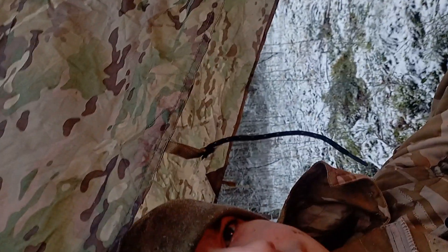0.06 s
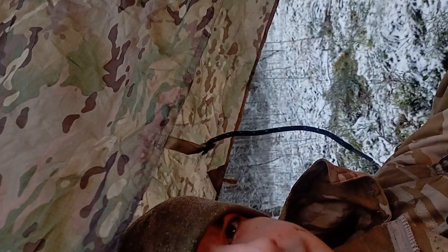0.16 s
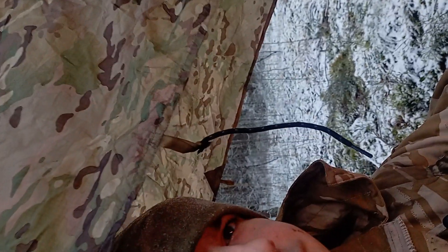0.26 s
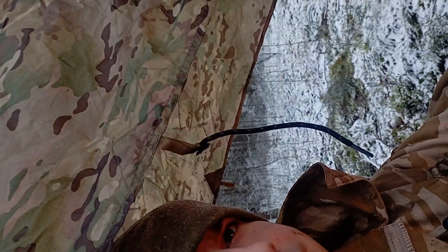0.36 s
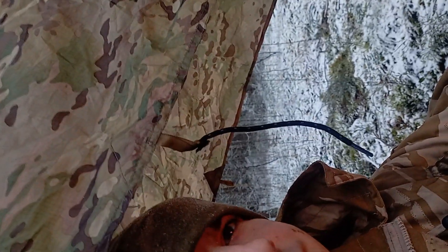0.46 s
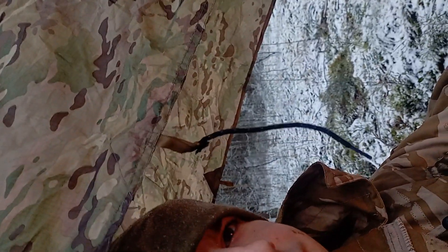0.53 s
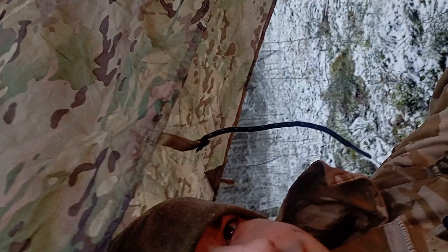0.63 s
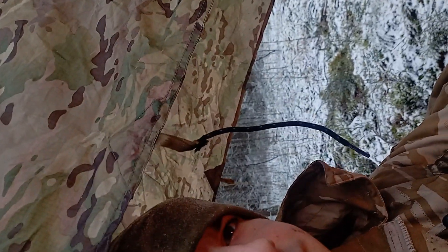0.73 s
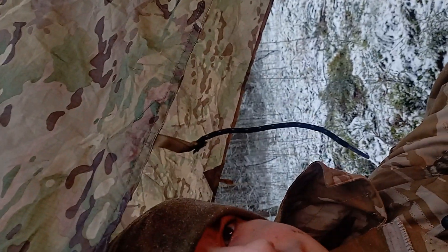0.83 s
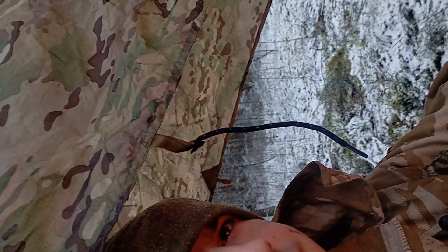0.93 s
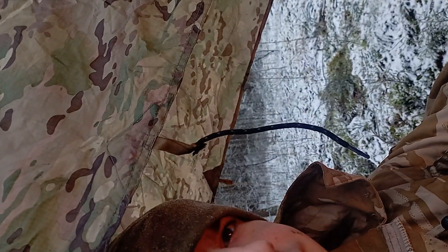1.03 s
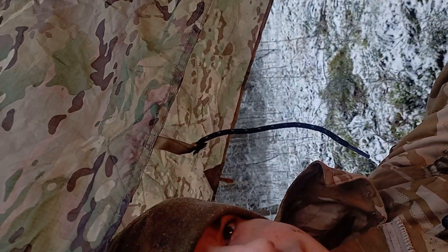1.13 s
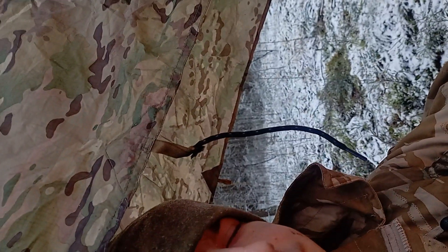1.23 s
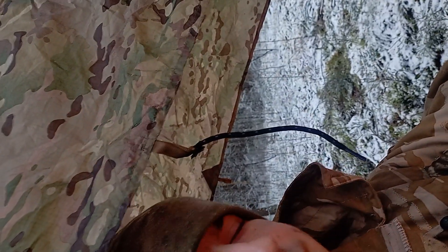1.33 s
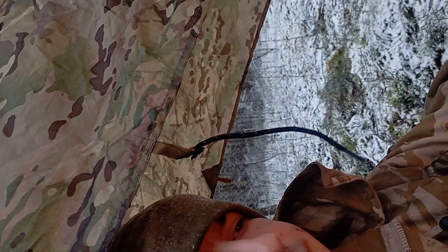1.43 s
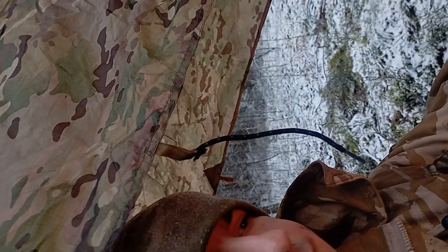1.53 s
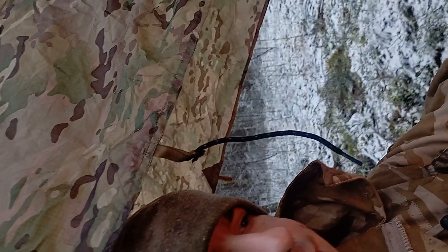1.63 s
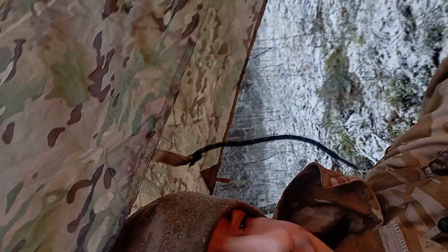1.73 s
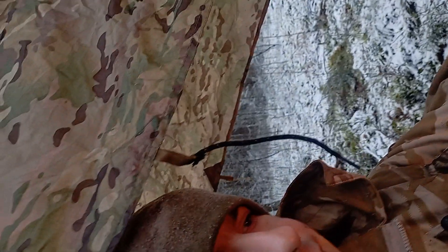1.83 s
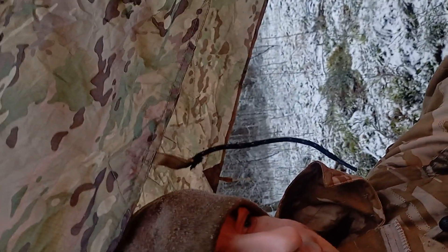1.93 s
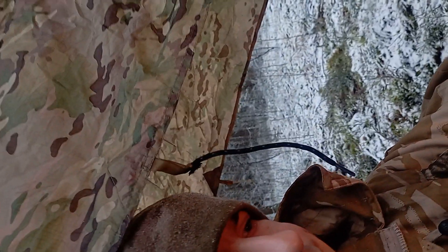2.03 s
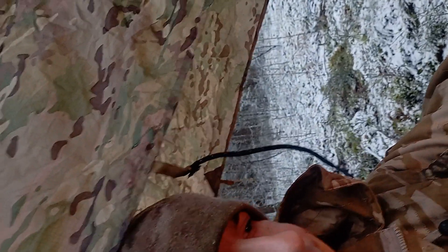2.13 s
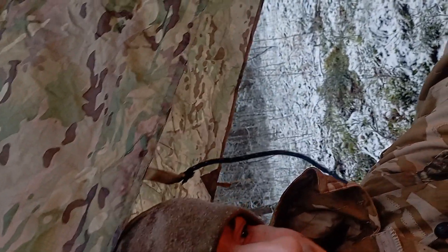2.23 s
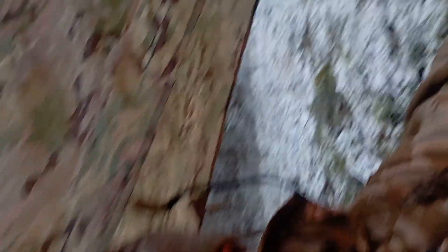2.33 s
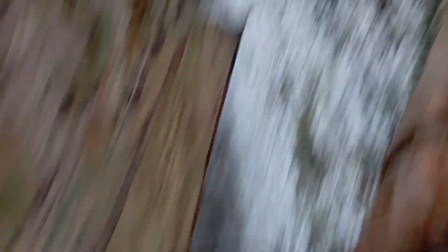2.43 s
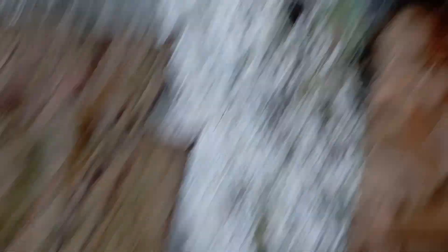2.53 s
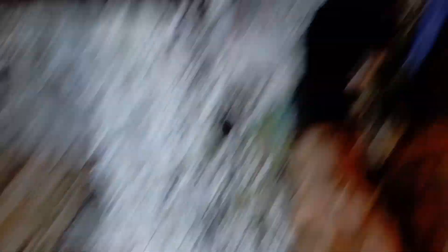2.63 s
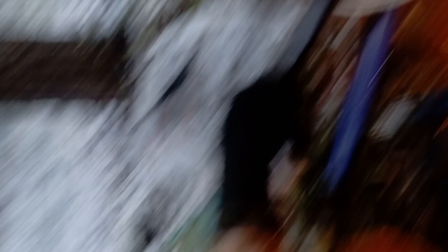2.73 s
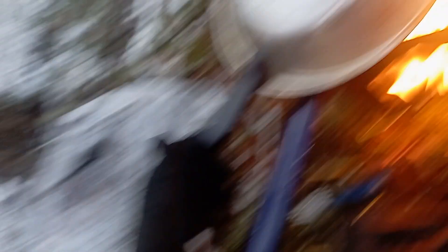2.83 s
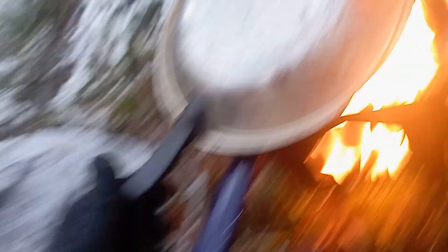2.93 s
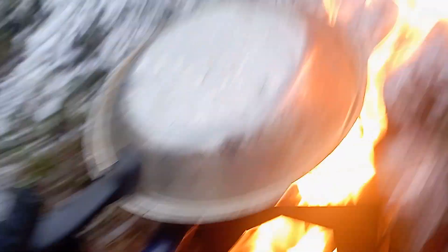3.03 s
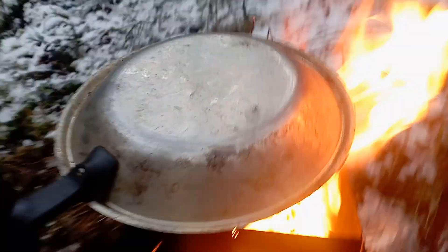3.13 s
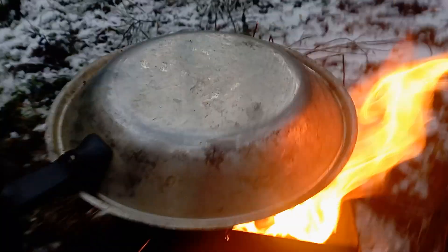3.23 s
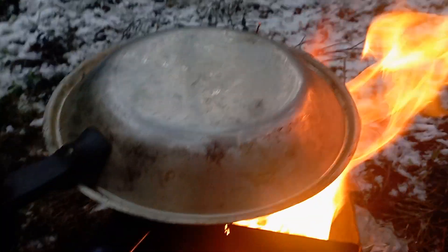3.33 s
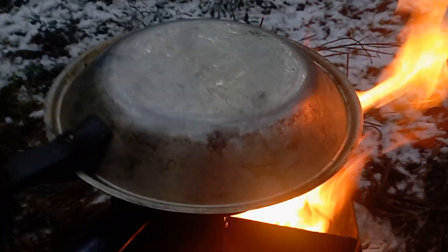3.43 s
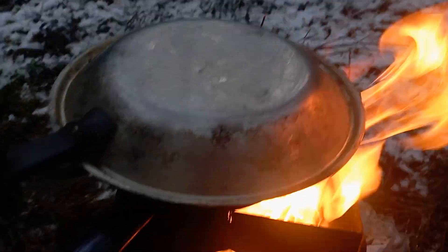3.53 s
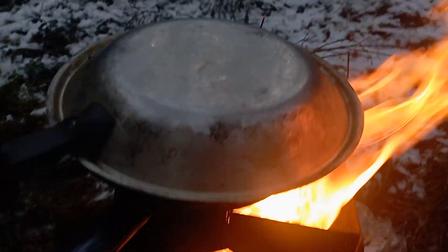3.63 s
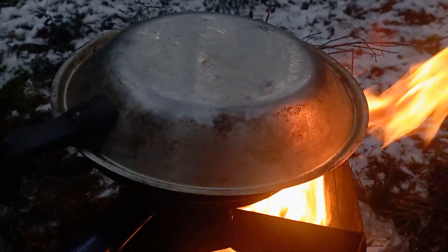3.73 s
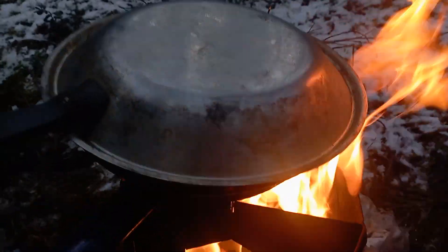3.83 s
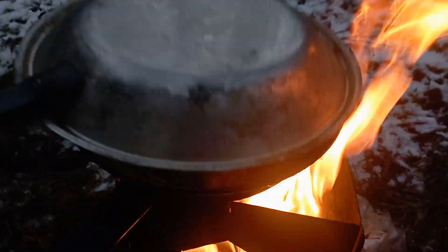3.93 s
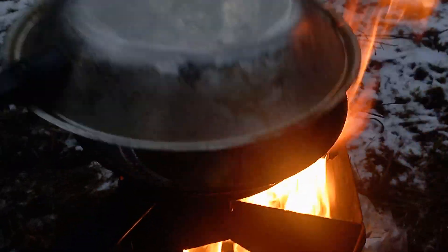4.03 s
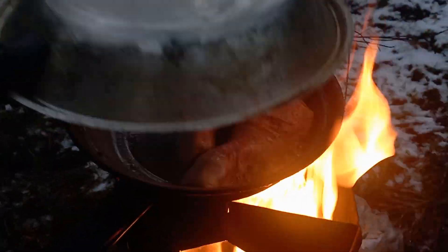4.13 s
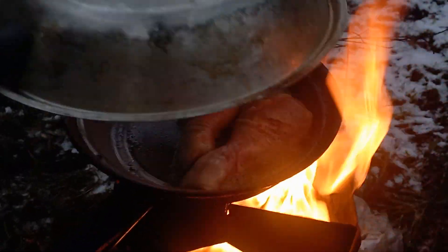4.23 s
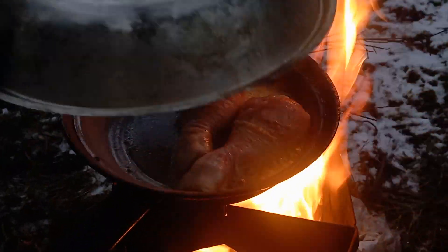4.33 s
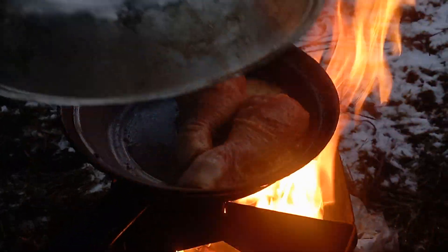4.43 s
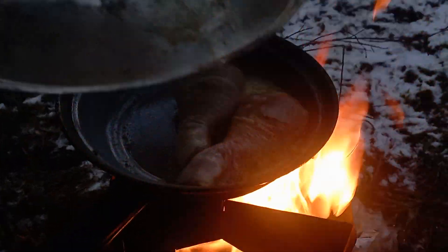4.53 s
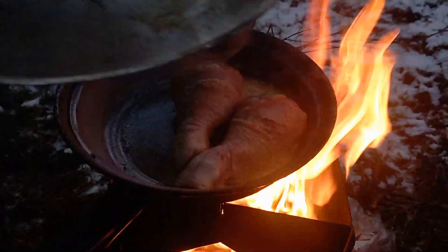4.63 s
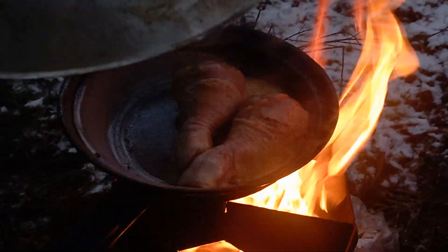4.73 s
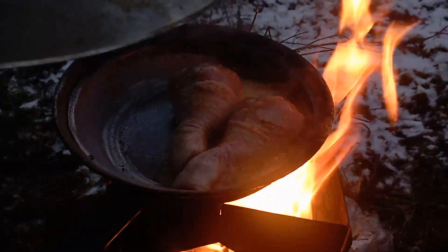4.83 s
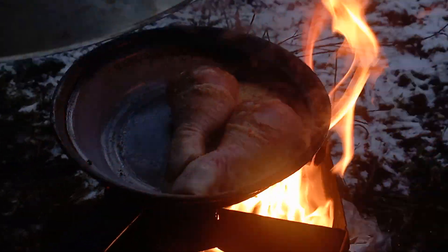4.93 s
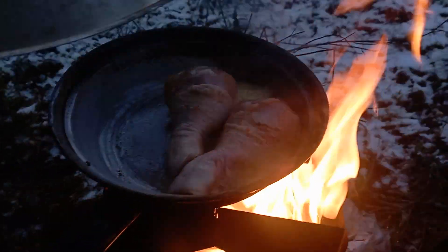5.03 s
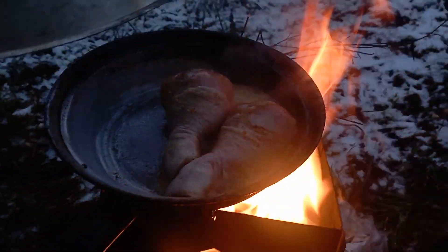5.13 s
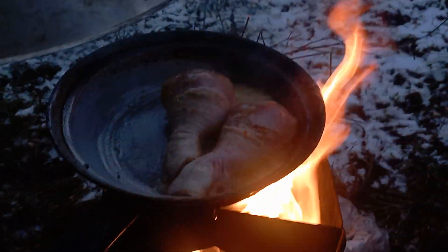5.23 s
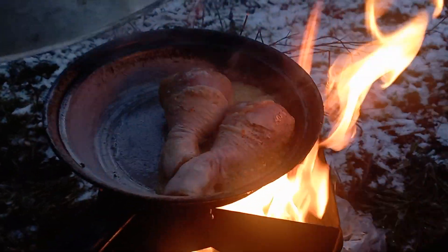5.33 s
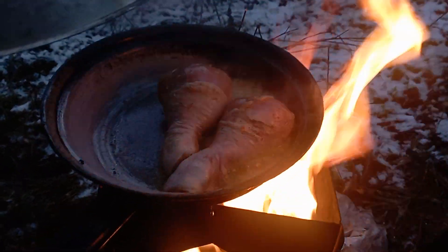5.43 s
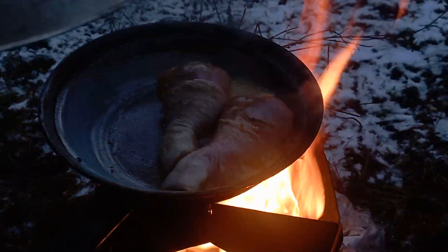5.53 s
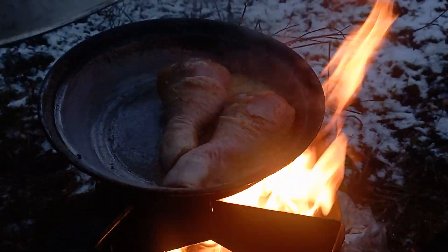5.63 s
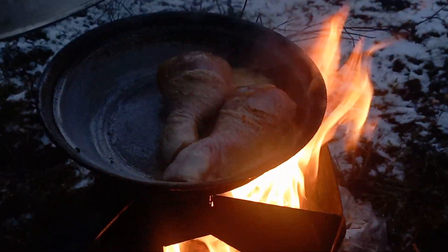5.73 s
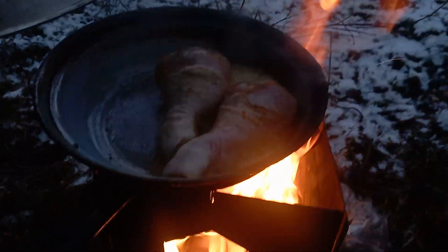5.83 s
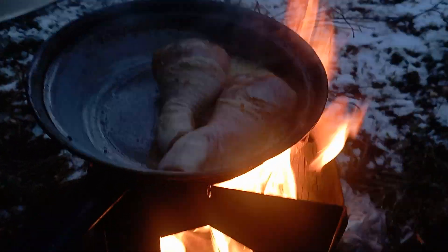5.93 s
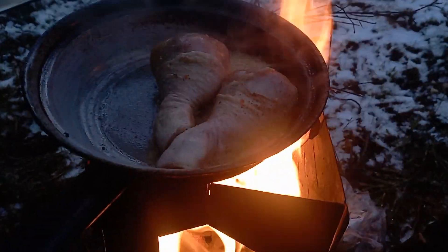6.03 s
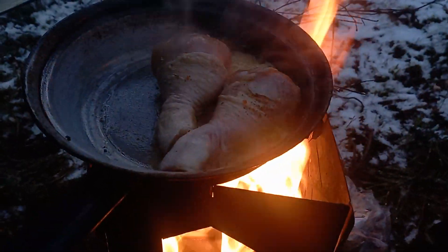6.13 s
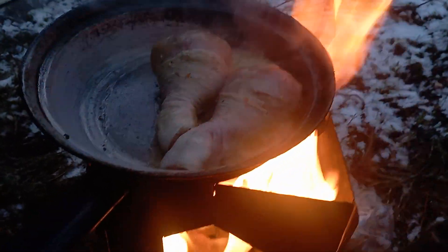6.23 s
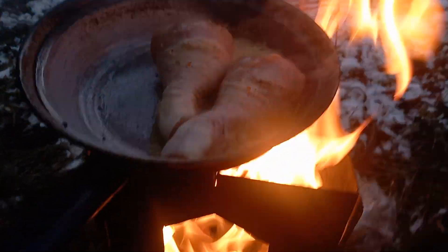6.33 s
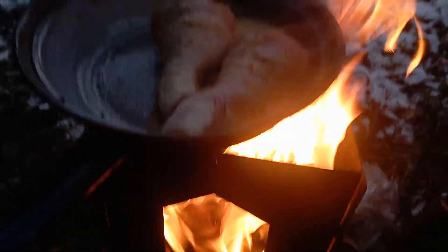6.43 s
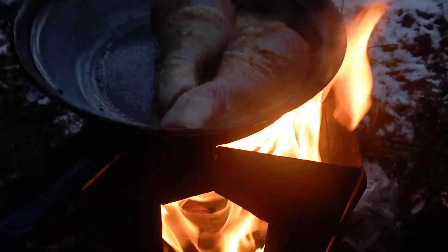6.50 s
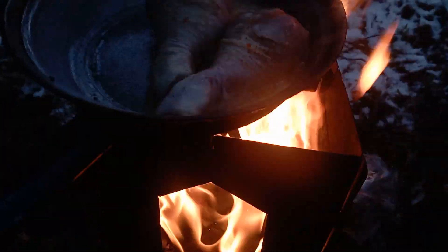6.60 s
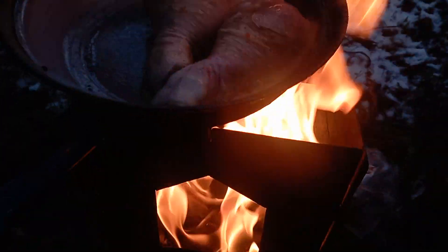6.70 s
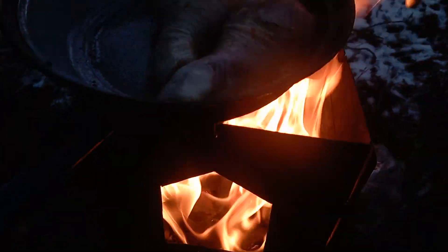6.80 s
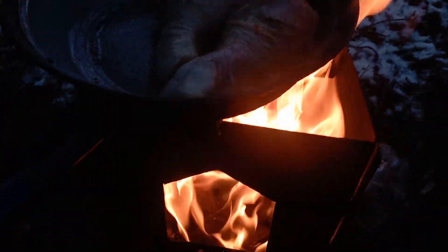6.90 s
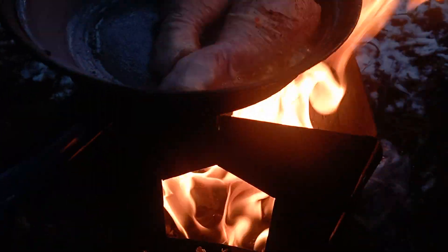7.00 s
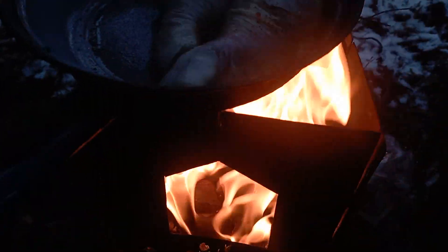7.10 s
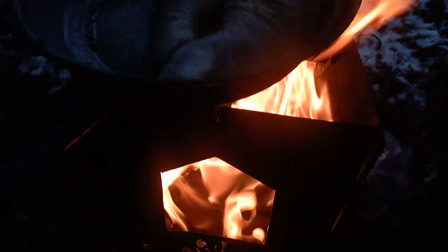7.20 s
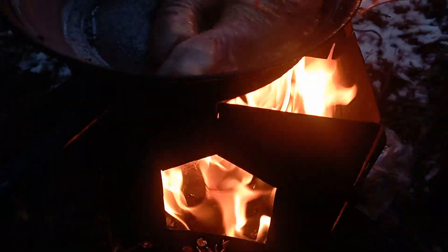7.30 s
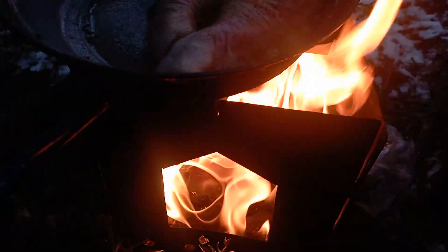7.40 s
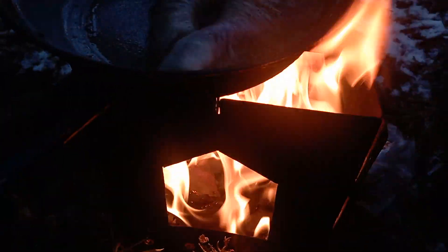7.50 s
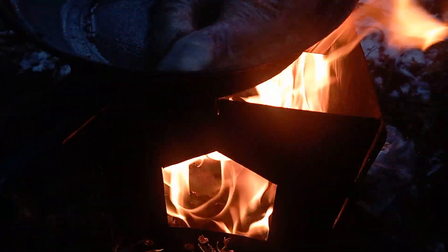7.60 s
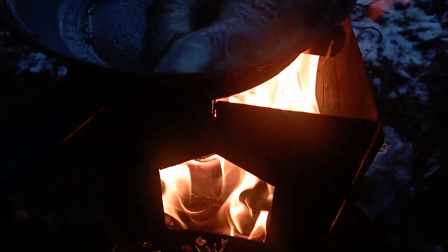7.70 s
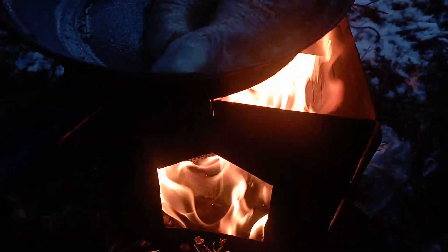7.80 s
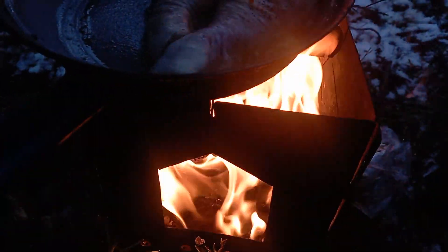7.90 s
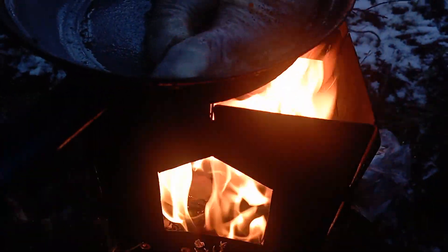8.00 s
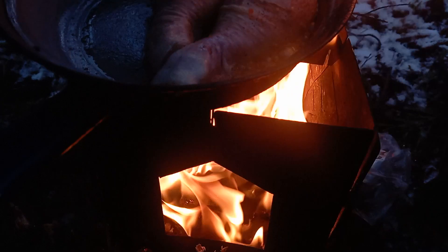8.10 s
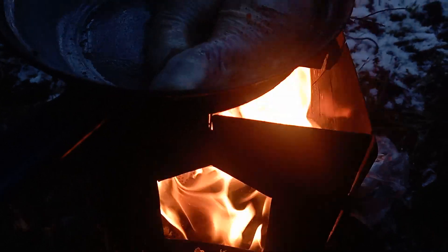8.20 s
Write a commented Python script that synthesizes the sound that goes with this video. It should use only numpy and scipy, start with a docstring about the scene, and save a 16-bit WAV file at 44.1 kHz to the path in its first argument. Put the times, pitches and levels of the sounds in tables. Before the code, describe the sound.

Close stereo sound in open air, without room echo: distant muffled frying and faint low flame puffs at first, then a brief rub of clothing and a dull handle knock. As the metal lid comes off, the hollow ring disappears and the sizzle grows crisp and strong, leaning left. Fat cracks sharply, juice bubbles pop, and burning wood snaps dryly until the end.

```python
"""Outdoors in the snow, close to a small wood stove: chicken sizzles in a lidded pan.
The microphone swings round to the pan and the lid is lifted: the hiss, random clicks over noise, loses
the hollow ring of the covered pan (resonant filters) and turns loud and bright.
Fat spits (filtered noise bursts), bubbles pop (short decaying tones) and flames flutter (coloured noise).
Wood snaps, clothing rustles (bands of noise) and a hand bumps the handle (struck modes)."""
import sys
import numpy as np
from scipy import signal
from scipy.fft import rfft, irfft
from scipy.io import wavfile
from scipy.ndimage import uniform_filter1d

SR = 44100
rng = np.random.default_rng(int(sys.argv[2]) if len(sys.argv) > 2 else 0)


def transcribe(u):
    """Save the signal u as a 16-bit wav file named by the first command-line argument.

    u: samples, shape (n,) or (channels, n), limited to [-1, 1]; the rate is SR.
    q: integer samples, one column per channel.
    """
    v = np.clip(np.atleast_2d(u).T, -1, 1)
    q = np.round(v * 32767).astype(np.int16)
    wavfile.write(sys.argv[1], SR, q)


N = 364001
T = np.arange(N) / SR
BINS = np.arange(2049) * SR / 4096  # Hz

# the frying, louder as the microphone comes near and the lid comes off:
# [t/s, bright fizz level/dB before surges and flares, fizz left minus right/dB, coarse simmer level/dB]
FRYING = [(0, -49, -1.5, -55.5), (2.45, -50.5, -3, -55), (2.75, -47.5, -1, -55), (3.05, -43, -7.5, -51),
          (3.21, -40.5, 3.5, -52.5), (3.5, -41.5, 1.5, -51.5), (3.79, -31.5, 5.5, -46.5),
          (4.0, -30.5, 3, -45.5), (4.25, -30.5, -0.5, -42), (4.3, -29, -2, -41.5),
          (4.65, -26.5, 5.5, -38.5), (5.0, -26.5, 8, -38), (5.35, -29, 5.5, -38.5),
          (6.25, -28.5, 5.5, -37.5), (6.6, -31, 6.5, -38), (8.25, -29.5, 7, -39)]
# the lid: [t/s, open share 0-1, lag of the echo from the metal nearby/ms]
LID_MOTION = [(0, 0, 1.32), (2.6, 0.03, 1.37), (3.0, 0, 1.5), (3.5, 0.2, 1.5), (3.72, 0.24, 1.3),
              (4.1, 0.92, 1.34), (5.0, 1, 1.77), (8.25, 1, 2.05)]
# where the microphone points: [t/s, share heard from above the pan 0-1, lag of the left port/ms]
MIC_AIM = [(0, 0.32, 0.26), (2.4, 0.12, 0.25), (2.6, 0, -0.046), (2.85, 0.87, -0.082), (3.6, 0.97, -0.1),
           (5.7, 1, -.14), (6.3, 0.95, -0.09), (8.25, 0.9, -0.1)]
# air resonances between pan and lid: [f/Hz with the lid shut, width/Hz, left level/dB, right level/dB]
PAN_AIR = [(1278, 220, 3.5, 19.5), (2046, 140, 8.5, 10), (2916, 290, 10, 11.5), (3710, 250, 7, 0.5),
           (4500, 110, 7, 6.5), (5210, 120, 6, 3), (6030, 170, 7.5, 2.5), (6680, 130, 4, 6),
           (8260, 260, 3.5, 3.5)]
# the loudest sharp spits of fat: [t/s, peak level/dB before panning, f/Hz, left minus right/dB]
FAT_SPITS = [(1.7305, -33.5, 5800, -5), (2.2355, -29, 9400, -10), (4.3005, -15, 8600, 2),
             (4.3679, -16, 9000, 7), (4.453, -15, 8800, -4), (4.55, -11, 9300, -4), (4.6517, -16, 9700, 10),
             (4.932, -15, 9700, -5), (4.9803, -14.5, 9200, 7), (5.05, -15, 9400, 7), (5.0637, -9, 9700, 5),
             (5.246, -6.5, 9300, 11), (5.577, -15, 8900, 5), (5.5934, -19, 9000, 5), (5.694, -17, 9400, 13),
             (5.801, -15, 9170, 10), (5.8687, -13, 9600, 9), (5.9855, -15, 9800, 5), (6.152, -13, 9700, 11),
             (6.2138, -20, 9700, 4), (6.3912, -14, 9500, -6), (6.4663, -17, 9700, 10),
             (6.9027, -26, 9500, -1), (6.9486, -15, 8800, 3), (7.3987, -20, 9700, 2)]


def amp(db):
    """Decibels to gain."""
    return 10 ** (np.asarray(db) / 20)


def curves(table):
    """Each column of a table, joined by straight lines in time."""
    s, *columns = np.transpose(table)
    return [np.interp(T, s, c) for c in columns]


def unit(x, axis=None):
    """Scale to rms 1."""
    return x / np.sqrt(np.mean(x ** 2, axis=axis, keepdims=True))


def ports(pan_db):
    """Left and right gain from the level left minus right."""
    return amp(np.array([[.5], [-.5]]) * pan_db)


def walk(rate):
    """Smooth chance with a spread near 1, aiming at a new value rate times a second."""
    k = int(SR / rate)
    steps = rng.standard_normal(N)[np.arange(N) // k]
    return 1.2 * uniform_filter1d(steps, k)


def slope(points, column=1):
    """A spectrum in dB from its corner points, straight over log frequency."""
    points = np.array(points)
    return np.interp(np.log(BINS + 1), np.log(points[:, 0]), points[:, column])


def colour(x, db):
    """Causal (minimum-phase) filter with the given spectrum, by folding its cepstrum."""
    cepstrum = irfft(np.log(amp(db)))
    fold = np.r_[1, np.full(len(db) - 2, 2), 1, np.zeros(len(db) - 2)]
    response = irfft(np.exp(rfft(cepstrum * fold)))
    return signal.oaconvolve(x, response)[:N]


def resonate(x, hz, width_hz):
    """One resonance with gain 1 at its centre."""
    return signal.lfilter(*signal.iirpeak(hz, hz / width_hz, fs=SR), x)


def ring(hz, t60):
    """A struck mode: a sine that falls 60 dB in t60 seconds."""
    t = T[:SR // 5]
    return np.sin(2 * np.pi * hz * t) * np.exp(-np.log(1000) * t / t60)


def add(out, s, sound):
    """Mix a sound into both channels from time s."""
    i = max(int(s * SR), 0)
    out[:, i:i + sound.shape[-1]] += sound[..., :max(N - i, 0)]


def late(x, lag_ms):
    """A sound delayed by a lag that may move."""
    return np.interp(T - lag_ms / 1000, T, x)


def sizzle(shared_hz=1600, covered_shared_hz=3100, split_hz=5770, echo=0.17, fizz_echo=0.092):
    """The frying: droplet clicks, smeared and hollow under the lid, crisp in the open."""
    # colour of the frying with the lid off: [f/Hz, left level/dB, right level/dB]
    open_colour = [(450.0, -31, -31.5), (900.0, -29.5, -29), (1200.0, -33, -23), (1500, -22.5, -18),
                   (2900.0, -13.5, -15), (4800, -11, -17), (5750, -8.5, -17.5), (7100, -2.5, -6.5),
                   (9180, 6, -2.5), (10100, 8.5, -7.5), (11430, 2, -14), (12360, -2.5, -13),
                   (14000, -3.5, -20), (15900, -11.5, -13.5)]
    # the covered pan heard from the side: [f/Hz, left level/dB, right level/dB]
    side_colour = [(466, -16.5, -10), (820, -34, -22.5), (1800, -11, -15.5), (2500.0, -13.5, -14),
                   (4050, -18.5, -8.5), (5940, -6, 1.5), (7400, 1, -0.5), (8760, 6.5, 6.5),
                   (11000, 7.5, 3.5), (12300, -2, 0), (13500.0, 3, -1), (15600.0, -1, -1.5)]
    # the covered pan heard from just above: [f/Hz, left level/dB, right level/dB]
    above_colour = [(480, -15, -12.5), (900.0, -23, -29), (1730, -28.5, -30.5), (2210, -23, -11.5),
                    (3300.0, -10, -22), (4800.0, -12, -26), (6130, -11, -13), (7260, -9.5, 0.5),
                    (8500, 1, 5.5), (9500, 10, 2), (11600, 5, -12.5), (13300, 3, -24), (16100, -7, -3)]
    # the standing wave between pan and rising lid: [t/s, f/Hz, level against the simmer/dB]
    lid_wave = [(2.8, 1275, -26), (3.3, 1250, -16), (3.7, 1335, -27), (4.1, 1570, -28), (4.4, 1424, -25),
                (4.7, 1247, -30), (5.05, 1162, -27), (5.6, 1220, -26.5), (6.3, 1336, -32)]
    surge_db, surges_per_s = 0.35, 13  # the fat surges and ebbs by chance
    flare_db = 2.06  # the fizz flares up round each spit
    # the air in the gap under the rim rises in pitch as the lid opens, and rings most when it is ajar
    gap_shut_hz, gap_rise_octaves = 420, 0.97
    gap_db, gap_ajar_share, gap_spread_share = -13.5, 0.36, 0.35

    fizz_db, pan_db, simmer_db = curves(FRYING)
    fizz_db = fizz_db + surge_db * walk(surges_per_s) + flare_db * flares()
    opening, lag_ms = curves(LID_MOTION)
    opening, above = np.clip([opening, curves(MIC_AIM)[0]], 0, 1)

    muffled = droplets(rate=5000, spread_db=2.5, mist_db=-1.5, splutter_db=0.83, patchy_db=2.1)
    crisp = droplets(rate=5000, spread_db=2.6, mist_db=-2.0, splutter_db=0.6, patchy_db=1.7)
    from_side = np.sqrt(1 - above) * voiced(muffled, side_colour)
    from_above = np.sqrt(above) * voiced(muffled, above_colour)
    covered = hollow(shared(from_side + from_above, covered_shared_hz), opening)
    covered_bands = split(covered, split_hz)
    open_bands = split(voiced(crisp, open_colour), split_hz)
    simmer, fizz = np.sqrt(1 - opening ** 2) * covered_bands + opening * open_bands

    gap_hz = gap_shut_hz * 2 ** (gap_rise_octaves * opening)
    gap_gain = amp(gap_db) * np.exp(-((opening - gap_ajar_share) / gap_spread_share) ** 2)
    wave_hz, wave_db = curves(lid_wave)
    gap_air = gap_gain * singing_air(gap_hz, width_hz=104)
    wave_air = amp(wave_db) * singing_air(wave_hz, width_hz=110)
    simmer = shared(simmer, shared_hz) + gap_air + wave_air
    # an echo off nearby metal combs the sound as lid and microphone move
    simmer = np.array([x + echo * late(x, lag_ms) for x in simmer])
    fizz = np.array([x + fizz_echo * (1 - opening) * late(x, lag_ms) for x in fizz])
    return simmer * amp(simmer_db) + fizz * amp(fizz_db) * ports(pan_db)


def droplets(rate, spread_db, mist_db, splutter_db, patchy_db):
    """Water droplets flash to steam in the fat: clicks of all sizes, in flurries, over a mist of tiny ones."""
    sizes = amp(spread_db * np.minimum(rng.exponential(size=(2, N)), 5))
    struck = rng.random((2, N)) < rate / SR  # rate in clicks per second
    clicks = unit(struck * sizes * rng.choice([-1, 1], (2, N)))
    mist = amp(mist_db) * rng.standard_normal((2, N))
    flurry_db = splutter_db * (walk(22) + np.array([walk(90), walk(90)]))
    return patches((clicks + mist) * amp(flurry_db), patchy_db)


def patches(x, db, size=3):
    """Each spot in the fat flares up briefly, at its own pitch: chance gains over time and frequency."""
    spectrum = signal.stft(x, nperseg=256)[2]
    field = rng.standard_normal(spectrum.shape)
    field = uniform_filter1d(uniform_filter1d(field, size, axis=1), size, axis=2)
    field = unit(field + field[::-1] / 2)  # each port also takes half of the other's pattern
    return signal.istft(spectrum * amp(db * field))[1][:, :N]


def voiced(clicks, table):
    """Clicks in the colour that each port hears, at rms 1."""
    return unit(np.array([colour(clicks[0], slope(table, 1)), colour(clicks[1], slope(table, 2))]))


def shared(pair, hz):
    """Waves below a frequency reach both ports alike."""
    difference = signal.sosfiltfilt(signal.butter(2, hz, fs=SR, output="sos"), pair[0] - pair[1])
    return pair + np.array([[-.5], [.5]]) * difference


def hollow(pair, opening):
    """The air between pan and lid rings, a little higher as the lid tips."""
    rise_octaves = 0.14
    hz, s, spectrum = signal.stft(pair, SR, nperseg=1024)
    hz = hz[:, None] / 2 ** (rise_octaves * np.interp(s, T, opening))
    ring_db = sum(np.reshape(db, (2, 1, 1)) / (1 + (2 * (hz - centre) / width) ** 2)
                  for centre, width, *db in PAN_AIR)
    return signal.istft(spectrum * amp(ring_db))[1][:, :N]


def split(x, hz):
    """The simmer below and the fizz above a frequency, each held near rms 1 over half a second."""
    def power(v):
        return uniform_filter1d(v ** 2, SR // 2)

    f = np.arange(N // 2 + 1) * SR / N
    low = irfft(rfft(x) / (1 + (f / hz) ** 8), N)
    high = x - low
    # the simmer keeps its balance between the ports, the fizz is levelled at each
    return np.array([low / np.sqrt(power(low).mean(axis=0)), high / np.sqrt(power(high))])


def singing_air(hz, width_hz):
    """A narrow, gliding resonance of the air under the lid: slow noise carried on a moving pitch."""
    low_pass = signal.butter(2, width_hz / 2, fs=SR, output="sos")
    wobble = signal.sosfilt(low_pass, rng.standard_normal((2, N)))
    phase = 2 * np.pi * np.cumsum(hz) / SR
    return unit(wobble[0] * np.cos(phase) + wobble[1] * np.sin(phase))


def flares(flare_s=0.011):
    """Near 1 round each spit, 0 in between."""
    times = np.array(FAT_SPITS)[:, 0]
    nearest = times[np.searchsorted((times[1:] + times[:-1]) / 2, T)]
    return np.exp(-((T - nearest) / flare_s) ** 2)


def crackle(count=700, loud_db=2.5, spread_db=2.0, centre_hz=9200, scatter_octaves=0.41, cycles=14,
            scatter_pan_db=12):
    """Single droplets snap out of the fizz, each ringing for about a millisecond at its own pitch and place."""
    out = np.zeros((2, N))
    fizz_db, pan_db, _ = curves(FRYING)
    t = T[:SR // 200]
    for when, size, pitch, length, place, lag in rng.random((count, 6)):
        i, hz = int(when * N), centre_hz * 2 ** (scatter_octaves * (pitch - .5))
        age = np.maximum(t * hz - np.array([[0], [2 * lag]]), 0)  # in cycles, at each port
        snap = np.sin(2 * np.pi * age) * np.exp(-np.log(1000) * age / (cycles * (.5 + length)))
        db = fizz_db[i] + loud_db - spread_db * np.log(size + 0.02)
        add(out, i / SR, snap * amp(db) * ports(pan_db[i] + scatter_pan_db * (place - .5)))
    return out


def spits(width_hz=3200, burst_db=-8, burst_s=0.00059, tail_db=-25, tail_s=0.0087, raw=0.014):
    """Each spit is one bright crack, a brief burst of steam and a short scatter from the pan."""
    out, t = np.zeros((2, N)), T[:SR // 40]
    for s, db, hz, pan_db in FAT_SPITS:
        steam = amp(burst_db) * np.exp(-t / burst_s) + amp(tail_db) * np.exp(-t / tail_s)
        crack = (t == 0) + steam * rng.standard_normal((2, len(t)))
        bright = resonate(resonate(crack, hz, 2 * width_hz), hz, 2 * width_hz)
        crack = resonate(bright, hz, width_hz) + raw * crack
        crack = crack / np.abs(crack).max(axis=1, keepdims=True)
        add(out, s, crack * amp(db) * ports(pan_db))
    return out


def bubble(hz, cycles=11, echo=0.21, echo_s=0.00141, width=0.49):
    """A bursting bubble swells, rings for a few cycles and echoes off the pan wall."""
    t = T[:SR // 40]
    burst = ring(hz, cycles / hz)[:len(t)]
    burst = burst + echo * np.interp(t - echo_s, t, burst)
    burst = resonate(resonate(burst, hz, width * hz), hz, width * hz)
    return burst / np.abs(burst).max()


def bubbles(count=1200, small_db=0.0, spread_db=13.0, centre_hz=2800, lid_db=-7, lid_ring=1.26,
            scatter_db=9, scatter_octaves=0.29):
    """Pops and crackling knots among small bubbles that follow the simmer; the lid's air rings with them."""
    # the loudest single pops: bubbles of juice bursting in the fat, and before 0.3 s small knocks: # [t/s, peak
    # level/dB before panning and lid, f/Hz, cycles of ring, left minus right/dB]
    pops = [(0.196, -47, 1300, 14, -5), (0.263, -45, 1300, 10, -5), (0.265, -38, 2050, 12, -3),
            (0.834, -47, 2950, 16, -2), (1.192, -42, 2950, 15, 1), (1.353, -40, 3000, 16, -1),
            (2.957, -31, 2620, 10, -3), (2.9838, -30, 2060, 7.2, -6), (3.043, -35, 2660, 11, -2),
            (3.4007, -39, 2064, 11, -8), (4.129, -26, 1970, 17, -3), (4.1305, -22, 2750, 9, -3),
            (4.241, -28.5, 2570, 9, -9), (4.4855, -25, 3810, 11, -5), (4.498, -21, 2660, 25, -12.5),
            (4.7217, -25, 2230, 6.9, -4), (4.7979, -25, 2500, 9, -10), (5.355, -25, 2900, 12, 2),
            (5.3772, -23.5, 2470, 10.4, -3), (5.4392, -27, 2780, 11, 1), (6.003, -26, 2740, 16, 3),
            (6.235, -17, 3670, 12, 8), (6.35, -24, 2990, 9, 2), (6.3588, -16.5, 3280, 17, 4),
            (6.895, -22, 3100, 11, -1), (7.1634, -25.5, 2900, 10, 0), (7.2668, -25, 2780, 11, 2),
            (7.516, -23, 3500, 14, 4), (7.5226, -20.5, 2840, 14, -1), (7.5565, -30, 2900, 12, 1),
            (8.015, -36, 2050, 22, 2), (8.048, -34, 2170, 22, -2), (8.089, -33, 2100, 18, 0)]
    # juice runs into the fat and a knot of bubbles crackles:
    # [centre t/s, length/s, level/dB before scatter, panning and lid, f/Hz before scatter, left minus right/dB]
    spatters = [(2.989, 0.075, -41, 2500, -2), (3.393, 0.046, -47, 2220, -2), (3.651, 0.019, -47, 2500, 1),
                (3.927, 0.024, -41, 3040, 0), (4.348, 0.015, -42, 2500, -2), (4.372, 0.012, -31, 3300, -1),
                (4.83, 0.03, -37, 3100, 8), (5.372, 0.041, -38, 2900, 0), (5.442, 0.02, -37, 2700, 0.5),
                (5.765, 0.043, -35.5, 2860, -3), (5.902, 0.013, -41, 3200, 4), (6.264, 0.015, -41, 3700, 8),
                (6.751, 0.02, -47, 2160, -3), (7.581, 0.05, -31.5, 3600, 4), (7.916, 0.021, -36, 3220, 2),
                (8.012, 0.039, -39, 2500, 3), (8.05, 0.017, -44, 2500, -5)]
    out = np.zeros((2, N))
    for s, db, hz, cycles, pan_db in pops:
        add(out, s, bubble(hz, cycles) * amp(db) * ports(pan_db))
    for s, length_s, db, hz, pan_db in spatters:
        for when, size, pitch in rng.random(size=(10, 3)):
            pop = bubble(hz * 2 ** (scatter_octaves * (pitch - .5)), cycles=2.7)
            gain = amp(db - scatter_db * (size - 1.0))
            add(out, s + length_s * (when - .5), pop * gain * ports(pan_db))
    closed = 1 - curves(LID_MOTION)[0]
    level_db = curves(FRYING)[2] + small_db + lid_db * closed
    for when, size, pitch, length in rng.random((count, 4)):
        db = level_db[int(when * N)] - spread_db * np.log(2 * size + 0.67)
        pop = bubble(centre_hz * 2 ** (1.15 * (pitch - .5)), cycles=4 + 12 * length ** 2)
        add(out, when * N / SR, pop * amp(db))
    # single pops ring the air in bands a quarter as wide as the table gives
    ringing = sum(resonate(out, hz, width / 4) for hz, width, *_ in PAN_AIR)
    return out * (1 - closed / 2) + lid_ring * closed * ringing


def fire(flutter_db=9.5, side_db=-16, puff_db=1.0, puff_cycles=0.31, swell_s=0.0112):
    """Fluttering flames, and soft puffs of gas that swell and fade as short low tones."""
    # the flames, louder with the microphone over the stove: [t/s, level/dB before panning]
    flame_level = [(0, -59.5), (2.3, -58.5), (2.8, -55), (4.8, -53.5), (6.3, -59.5), (6.8, -55), (7.3, -60),
                   (7.8, -53), (8.25, -63)]
    # the strongest puffs of flaring gas: [t/s, level/dB before puff_db and panning, f/Hz]
    puffs = [(0.22, -41, 98), (0.299, -37, 147), (0.681, -37.5, 104), (1.571, -40.5, 135),
             (1.719, -43, 170), (1.823, -39, 170), (1.851, -41, 175), (2.765, -34, 90), (3.398, -36.5, 122),
             (3.443, -30.5, 134), (4.025, -37, 149), (4.807, -38, 129), (5.173, -41, 167),
             (5.424, -39.5, 151), (5.543, -43, 191), (5.801, -40, 107), (6.84, -36, 111.2),
             (7.911, -42, 111), (7.978, -44, 95)]
    flame_db, = curves(flame_level)
    middle = flutter(flutter_db)
    side = amp(side_db) * flutter(flutter_db) * np.array([[1], [-1]])
    out = (middle + side) * amp(flame_db)
    t = T[:SR // 20] - swell_s
    for s, db, hz in puffs:
        tone = np.sin(2 * np.pi * (hz * t + rng.random()))
        add(out, s, amp(db + puff_db) * tone * np.exp(-np.abs(t * hz / puff_cycles) ** 0.6))
    return out * ports(-1.8)


def flutter(depth_db):
    """The low, uneven roar of flames: noise of wandering level, coloured, at rms 1."""
    # colour of the flames: [f/Hz, level/dB]
    flame_colour = [(20, -6.5), (30, -22), (42, -31), (62, -3), (100, 2), (160, -1), (240, -5.5),
                    (400, -26.5), (800, -36.5), (1600, -25)]
    uneven = rng.standard_normal(N) * amp(depth_db * np.tanh(walk(45)))
    return unit(colour(uneven, slope(flame_colour)))


def snaps(crack_hz=2000, crack_s=0.0016, thud_db=-11, thump_db=-25):
    """Burning wood splits with a dry crack, a short knock and a low thud from the firebox."""
    # snaps of the burning wood: [t/s, level/dB, knock f/Hz, cycles of ring,
    # crack gain against the knock/dB, firebox gain against the knock/dB before thud_db and thump_db]
    wood_snaps = [(0.265, -51, 700, 2, -10, -3), (2.2354, -39, 900, 2.2, 1.5, -9),
                  (5.2466, -11.5, 1900, 0.87, -15, -2), (6.9316, -28, 1850, 7.6, -1, -14),
                  (6.9435, -11, 2120, 6.6, -6, -4.5), (6.9438, -24, 1576, 19, -18, -8),
                  (7.605, -24, 1690, 32, -16, -17)]
    out, t = np.zeros((2, N)), T[:SR // 5]
    firebox = amp(thud_db) * ring(560, 0.003) + amp(thump_db) * (ring(190, 0.025) + ring(620, 0.012))
    for s, db, hz, cycles, crack_db, firebox_db in wood_snaps:
        knock = resonate(ring(hz, cycles / hz), hz, 2.0 * hz)
        crack = rng.standard_normal((2, len(t))) * np.exp(-t / crack_s)
        crack = resonate(crack, crack_hz, 2 * crack_hz)
        crack = amp(crack_db) * crack / np.abs(crack).max()
        add(out, s, amp(db) * (knock - amp(firebox_db) * firebox + crack))
    return out


def handling(grip_db=5.5, apart=0.27):
    """Uneven rubbing of cloth and glove and the scrape of the lifting lid as bands of noise, and dull bumps
    that ring the handle's modes."""
    # clothing and grip rubbing, and at 4.3 s the lid scraping as it lifts: [centre t/s, half length/s,
    # level/dB, f/Hz, width/Hz before widening]
    rustles = [(0.249, 0.015, -58.5, 218, 219), (0.313, 0.016, -56.5, 218, 219),
               (2.62, 0.13, -56.5, 290, 207), (2.554, 0.16, -52, 4800, 2740),
               (2.559, 0.1, -70.5, 1200, 900), (2.815, 0.052, -59, 280, 200),
               (3.135, 0.02, -42.5, 165, 131), (3.169, 0.031, -54, 294, 193), (4.301, 0.15, -61.5, 226, 80),
               (7.714, 0.017, -45.5, 300, 120.3), (7.841, 0.085, -54.5, 315, 112)]
    # the hand takes the handle and bumps it: [t/s, level/dB before the handle's own gains and panning]
    bumps = [(3.112, -62), (3.137, -56), (3.167, -55), (3.5797, -39.5), (3.59, -41.5)]
    # the handle rings: [f/Hz, level/dB, t60/s]
    handle = [(360, 11.5, 0.084), (290, -7, .05), (498, -11, 0.18), (900, -17, 0.077), (170, 1, 0.072)]
    out = np.zeros((2, N))
    for s, half_s, db, hz, width_hz in rustles:
        t = T[:int(6 * half_s * SR)] - 3 * half_s
        grip = amp(grip_db * np.tanh(walk(66.6)[:len(t)]))
        mid, side = rng.standard_normal((2, SR * 2))[:, :len(t)] * grip
        rub = mid + apart * side * np.array([[1], [-1]])
        for _ in range(3):  # three wide passes make one narrower band
            rub = resonate(rub, hz, 2.3 * width_hz)
        add(out, s + t[0], unit(rub) * amp(db) * np.exp(-(t / half_s) ** 2 / 2))
    knock = sum(amp(db) * ring(hz, t60) for hz, db, t60 in handle)
    for s, db in bumps:
        add(out, s, amp(db) * knock * ports(2.6))
    return out


def off_axis(pair):
    """Sound from one side reaches the nearer port first: the left port lags or leads."""
    return np.array([late(pair[0], curves(MIC_AIM)[1]), pair[1]])


def scene():
    """Pan, stove and hands in the open air; the spits reach both ports at once."""
    return spits() + off_axis(sizzle() + crackle() + bubbles() + fire() + snaps() + handling())


def record(dry):
    """The microphone thins the deep bass and cuts the top."""
    bass_hz, top_hz = 42, 15850
    dry = signal.sosfilt(signal.butter(2, bass_hz, "high", fs=SR, output="sos"), dry)
    return signal.sosfilt(signal.ellip(12, .1, 80, top_hz, fs=SR, output="sos"), dry)


dry = scene()
out = record(dry)
transcribe(out)
```